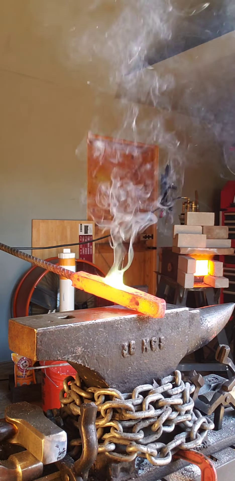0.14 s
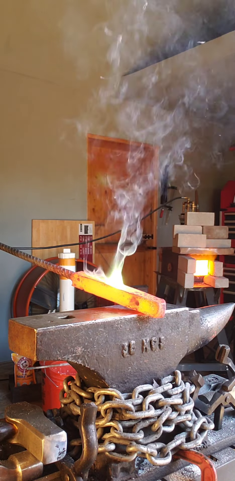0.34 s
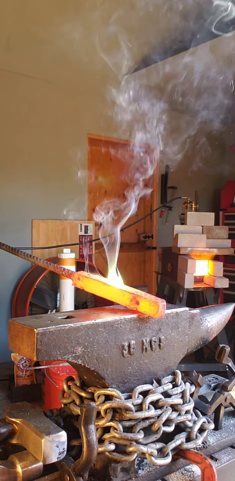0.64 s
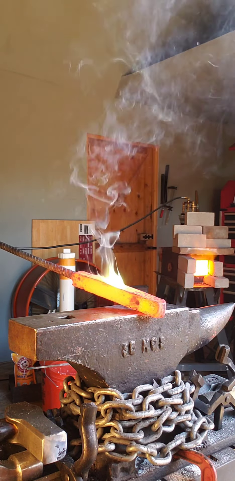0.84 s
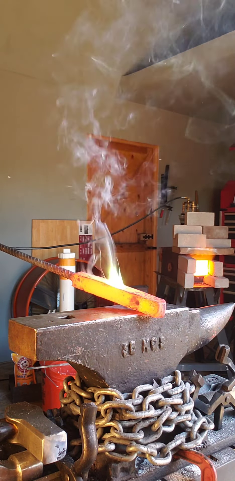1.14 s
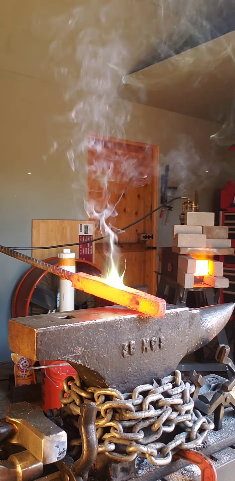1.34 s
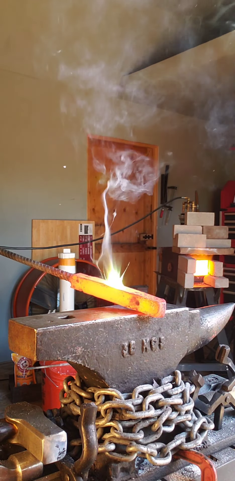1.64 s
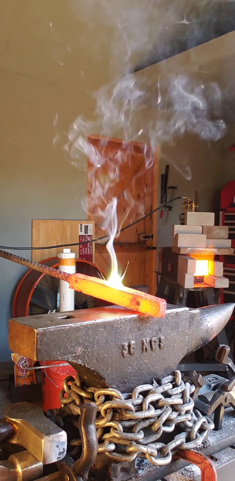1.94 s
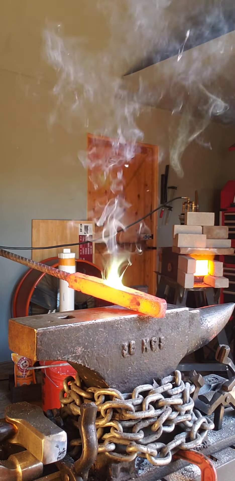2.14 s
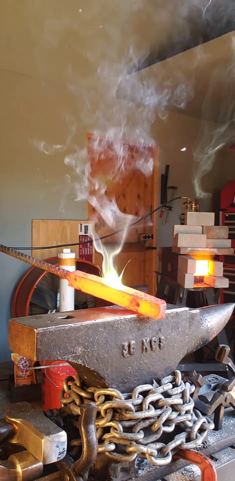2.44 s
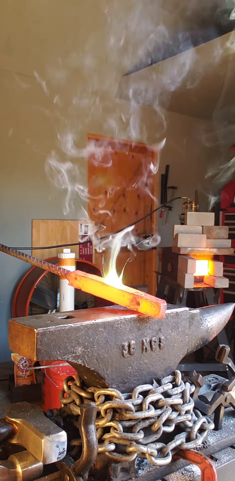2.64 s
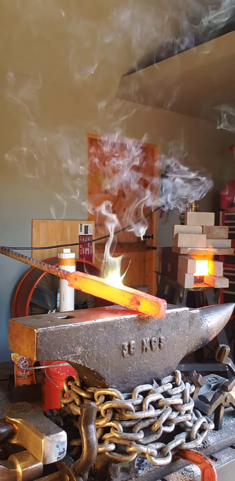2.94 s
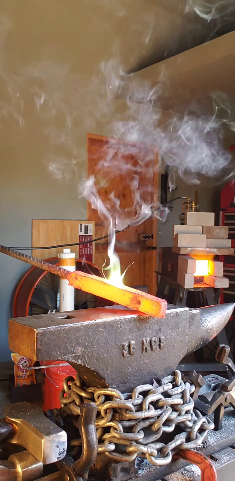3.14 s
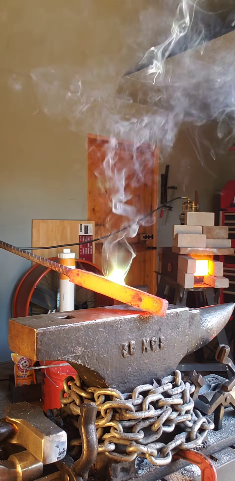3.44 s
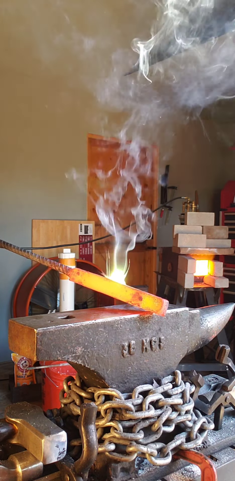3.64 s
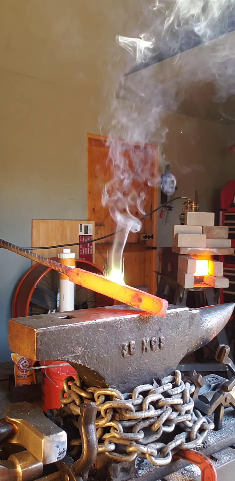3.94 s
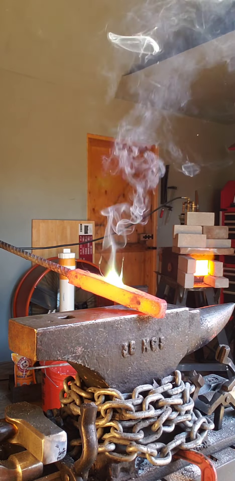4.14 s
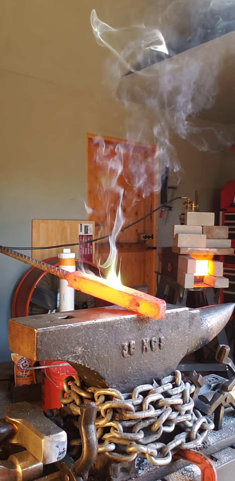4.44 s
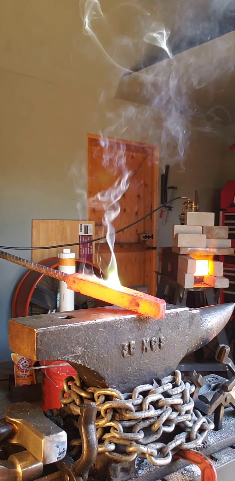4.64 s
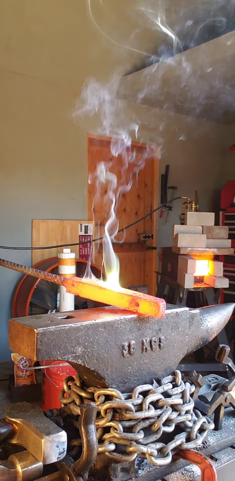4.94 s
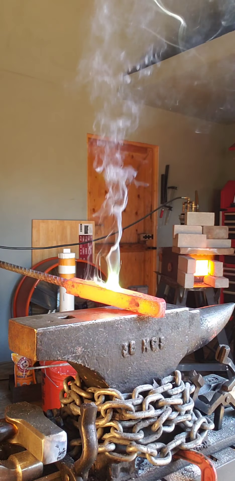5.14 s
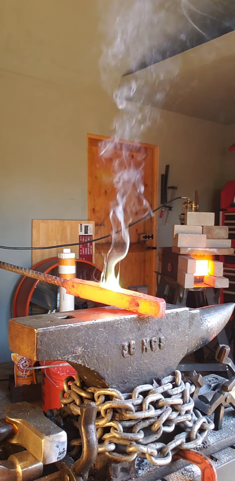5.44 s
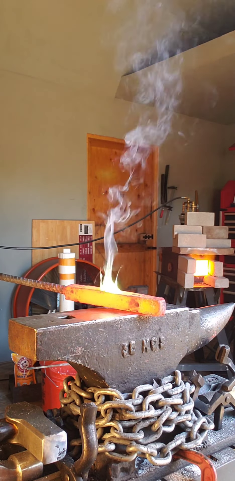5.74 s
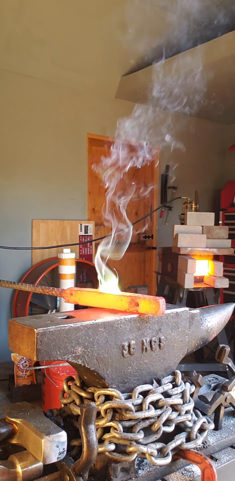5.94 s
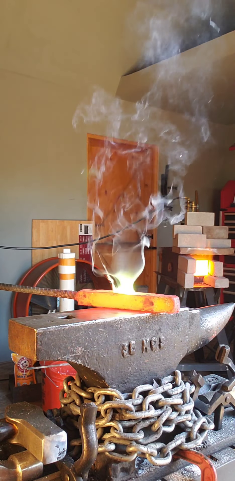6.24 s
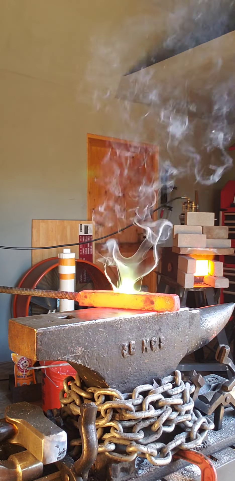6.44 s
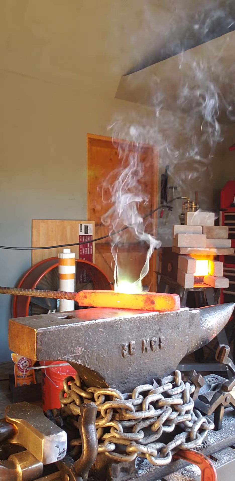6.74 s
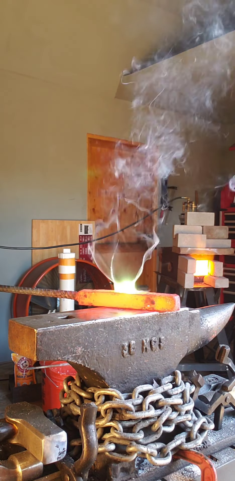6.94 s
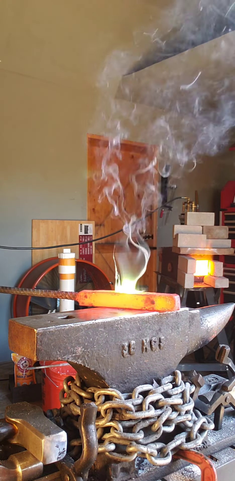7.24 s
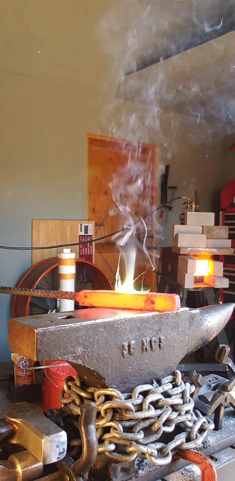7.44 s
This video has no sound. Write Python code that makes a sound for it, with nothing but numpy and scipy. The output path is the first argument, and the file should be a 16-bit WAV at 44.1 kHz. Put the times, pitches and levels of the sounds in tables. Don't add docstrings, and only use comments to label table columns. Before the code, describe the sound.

A lit gas forge roars steadily in a workshop, low-mid and hollow, with faint hiss; late on, a hot bar gives two tiny gritty scrapes.

```python
import sys
import numpy as np
from scipy import signal
from scipy.fft import rfft, irfft, next_fast_len
from scipy.io import wavfile
from scipy.ndimage import uniform_filter1d, map_coordinates

SR = 44100
rng = np.random.default_rng(int(sys.argv[2]) if len(sys.argv) > 2 else 0)


def gain_from_db(level_db):
    decades = np.asarray(level_db, float) / 20
    return 10 ** decades


def master(y):
    cut = np.clip(np.atleast_2d(y).T, -1, 1)
    pcm = np.round(cut * 32767)
    wavfile.write(sys.argv[1], SR, pcm.astype(np.int16))


N = 334485
TIME = np.arange(N) / SR
SIZE = next_fast_len(N + SR)
HZ = np.fft.rfftfreq(SIZE, 1 / SR)

# pitch_hz, width_hz, left_db, right_db
WAVES = [(56.2, 20, -24, -23.5), (71.5, 8, -16, -18.5), (95.8, 15.5, -16.5, -18.5), (122, 22, -19.5, -19.5),
         (136.6, 14, -17, -18), (166.4, 18, -6.5, -8.5), (181.5, 22, -14, -22.5), (207.4, 36, -12.5, -12),
         (227.2, 10, -13.5, -18.5), (238.8, 17, -12.5, -31), (264.4, 25, -15.5, -13.5),
         (277, 9.9, -8, -14.5), (300, 9.5, -15, -59), (304.7, 17, -12, -14), (345.4, 12.4, -4, -10.5),
         (352.1, 7.8, 1.5, 0.8), (375.8, 34.5, -4.5, -13.5), (381.2, 25, -41, -8.5), (407, 19, -10, -14.5),
         (436.3, 13, -4.5, -12.5), (447.2, 17.5, -4.5, -6), (477.8, 14.8, -6.5, -13.5),
         (499, 16.5, -13, -20), (524.5, 23, -16, -14), (547.5, 19.5, -13, -14.5), (576, 13, -13.5, -19.5),
         (591.5, 19, -12, -15), (632, 33, -21, -23), (653, 30, -20.5, -19), (694, 42, -21, -19.5)]
# low_hz, high_hz, swell_s
WAVE_GROUPS = [(0, 150, .3), (150, 322, .2), (322, 402, .2), (402, 495, .2)]
GROUP_LEVELS = [-34.5, -26.5, -22.5, -26]
# time_s, wave_hz, change_db
WAVE_SURGES = [(0.08, 350, 0.5), (0.47, 445, 3), (0.53, 200, -2.5), (0.69, 95, -7), (1.22, 350, -3.5),
               (1.26, 445, 3), (1.47, 350, 1.5), (1.7, 445, 4), (2.0, 445, -1.5), (2.15, 350, -3),
               (2.37, 445, 2.0), (2.85, 200, 3), (2.99, 350, 2.5), (3.34, 350, -4.5), (3.7, 350, -3.5),
               (3.92, 350, 1), (4.3, 350, -1.5), (4.3, 445, -2.5), (4.58, 445, 3), (4.65, 350, 2),
               (5.07, 200, 2), (5.32, 445, -4.0), (5.37, 200, -3), (5.41, 350, -1.5), (5.91, 350, 3.5),
               (6.06, 445, -3), (6.61, 350, 4.5), (6.89, 350, -3.5), (6.99, 445, 3.5), (7.36, 350, 2.5)]


def firebox():
    surge_half_width_s, surge_depth = 0.07, 1.24
    evenness = 0.9
    roar = np.zeros((2, N))
    for (low, high, swell_s), level_db in zip(WAVE_GROUPS, GROUP_LEVELS):
        waves = [wave for wave in WAVES if low <= wave[0] < high]
        ring = turbulence(resonances(waves), patchy_db=0.0)
        ring = ring / ring.mean(0).std()

        span = round(swell_s * SR)
        power = uniform_filter1d(uniform_filter1d(ring.mean(0) ** 2, span), span)
        chance_swell = np.abs(power) + 1e-12

        surge_db = np.zeros(N)
        for time_s, wave_hz, change_db in WAVE_SURGES:
            if low <= wave_hz < high:
                surge_db += change_db * np.exp(-0.5 * ((TIME - time_s) / surge_half_width_s) ** 2)
        roar += gain_from_db(level_db + surge_depth * surge_db) * ring / chance_swell ** (evenness / 2)
    return roar


# pitch_hz, width_hz, left_db_per_hz, right_db_per_hz
TUBE_WAVES = [(727, 26, -62.5, -56), (762, 37, -58.5, -58.5), (799.4, 31.5, -59.5, -52),
              (820, 9, -61.5, -57), (836, 53, -60.5, -61), (876, 16, -58.5, -55), (905, 20, -60, -56.5),
              (922.4, 19, -59, -54.5), (938.5, 14.5, -58.2, -51.5), (991, 53, -62, -57),
              (1023, 25, -69.5, -59), (1041, 14, -71, -58), (1060, 50, -67.5, -70), (1086, 45, -61.5, -65),
              (1136.6, 22.5, -57.5, -59.5), (1155, 17, -80.5, -61.5), (1171, 27, -70, -82),
              (1202, 48, -64, -66), (1245, 50, -63, -62.5), (1283, 25, -65.5, -69), (1318, 40, -63.5, -61),
              (1323, 17, -64.5, -64.5), (1360, 54, -66, -68), (1420, 34, -71, -72.0)]
# pitch_hz, left_db_per_hz, right_db_per_hz
JET_NOISE = [(1460, -71, -71.5), (1640, -71, -69), (1804, -82, -72.5), (1850, -78.5, -79.5),
             (2036, -79, -80), (2213, -72.5, -73), (2254, -78, -75), (2390, -83, -81.5), (2560, -87, -84),
             (2700, -85.5, -88), (2860, -84, -86.5), (3020, -86.5, -85)]


def burner():
    upper_waves = [wave for wave in WAVES if wave[0] >= WAVE_GROUPS[-1][1]]
    upper = gain_from_db(-35.5) * resonances(upper_waves)
    fade_in = [(1250, -120, -120), (1396, -71.0, -72.5)]
    fade_out = [(3120, -91.0, -93.5), (3600, -130, -130)]
    jet = gain_from_db(along(fade_in + JET_NOISE + fade_out))
    jet = jet * walls(t60=0.38, wet_db=-10.0)
    shape = np.sqrt(upper ** 2 + resonances(TUBE_WAVES) ** 2 + jet ** 2)
    flicker_db = 0.25 * wobble(8) + 0.37 * wobble(18)
    return gain_from_db(flicker_db) * turbulence(shape, patchy_db=0.51)


# pitch_hz, left_db_per_hz,
# right_db_per_hz
GAS_HISS = [(3150, -90.5, -87.5), (4060, -93, -89.5), (4530, -94, -85), (4900, -92, -89.5),
            (5400, -96.5, -88), (5860, -100, -97.5), (6300, -99, -99), (7000, -95.5, -96.5),
            (7500, -99.5, -100), (8250, -100, -101.5), (8800, -100.5, -102.5),
            (9180, -94.5, -94.5), (9930, -93, -90), (10500, -94.5, -89), (10970, -92.5, -85.5),
               (12000, -92.5, -86), (12600, -94, -92.5), (13100, -91, -92.5), (13550, -86.5, -88),
               (14200, -89.5, -91.5), (14900, -91.5, -95.5), (15400, -87, -93), (16500, -86, -93)]


def nozzle():
    top_hz = 15750
    fade_in = [(2700, -130, -130), (3010, -93.5, -92)]
    shape = gain_from_db(along(fade_in + GAS_HISS)) * walls(t60=0.25, wet_db=-8.5)
    flutter_db = 0.2 * wobble(4) + 0.4 * wobble(30)
    return gain_from_db(flutter_db) * turbulence(shape * (HZ < top_hz), patchy_db=0.9)


# start_s, peak_level_db, left_minus_right_db
SCRAPES = [
    (6.6029, -35.5, -1.0),
    (6.6694, -44, -1.5),
]


def bar():
    rise_s, fall_s = 0.004, 0.13
    band = signal.butter(4, [2700, 5900], "band", fs=SR, output="sos")
    noise = rng.standard_normal(N) + 0.4 * rng.standard_normal((2, N))
    grit = signal.sosfilt(band, noise)
    level = np.zeros((2, N))
    for start_s, peak_db, pan_db in SCRAPES:
        age = np.clip(TIME - start_s, 0, None)
        peak = gain_from_db([[peak_db + pan_db / 2], [peak_db - pan_db / 2]])
        level += peak * gain_from_db(-60 * age / fall_s) * (1 - np.exp(-age / rise_s))
    return gain_from_db(-9.5) * level * grit / grit.std()


# pitch_hz, level_db, unsteadiness_db
MACHINE_HUMS = [(38, -58.5, .5), (56.9, -57, .5), (58.5, -45.5, .5), (120.1, -47, 1), (190.1, -45, 1.5)]
# pitch_hz, level_db_per_hz
AIR_MOVEMENT = [(5, -86), (30, -81.5), (45, -80), (60, -110)]


def machines():
    tones = np.zeros(N)
    for pitch_hz, level_db, drift_db in MACHINE_HUMS:
        level = np.sqrt(2) * gain_from_db(level_db + drift_db * wobble(0.94))
        tones += level * np.sin(2 * np.pi * (pitch_hz * TIME + rng.random()))
    left_right = gain_from_db([[0.8], [-0.8]])
    return tones * left_right + turbulence(gain_from_db(along(AIR_MOVEMENT)), patchy_db=0.5)


def resonances(waves):
    power = 0
    for pitch_hz, width_hz, left_db, right_db in waves:
        detuning = (pitch_hz * pitch_hz - HZ ** 2) / (HZ * width_hz + 1)
        power = power + gain_from_db([[left_db], [right_db]]) ** 2 / (1 + detuning ** 2) ** 2
    return np.sqrt(power) / np.sqrt(1 + (52 / (HZ + 1)) ** 12)


# pitch_hz, likeness_0_to_1, left_lead_radians
PORT_LIKENESS = [(60, .997, 0), (200, .985, 0), (450, .95, 0), (850, .8, 0), (1100, .5, 1.6),
                 (1300, .82, 3.1), (1650, .85, 3.1), (1780, .3, 1.5), (1900, .7, -.1), (2200, .85, -.5),
                 (2500, .3, -1.2), (2650, .5, -3.1), (3000, .5, -3.3), (4500, .35, -9), (6500, .15, -15.8)]


def turbulence(gain, patchy_db):
    spectra = signal.stft(rng.standard_normal((2, SIZE)), nperseg=512)[2]
    patches = rng.standard_normal(spectra.shape[1:])
    patches = uniform_filter1d(uniform_filter1d(patches, 6, 0), 12, 1)
    patchy = spectra * gain_from_db(patchy_db * patches / patches.std())
    common, differing = rfft(signal.istft(patchy, nperseg=512)[1], SIZE)

    alike, lead = along(PORT_LIKENESS)
    turn = np.arccos(np.clip(alike, 0, 1)) / 2
    left = (np.cos(turn) * common + np.sin(turn) * differing) * np.exp(0.5j * lead)
    right = (np.cos(turn) * common - np.sin(turn) * differing) * np.exp(-0.5j * lead)
    return irfft(np.sqrt(SR / 2) * gain * np.array([left, right]), SIZE)[:, :N]


def walls(t60, wet_db):
    tail = rng.standard_normal(SR) * gain_from_db(-60 * np.arange(SR) / SR / t60)
    echoes = rfft(tail / np.linalg.norm(tail), SIZE)
    ripple = np.abs(1 + gain_from_db(wet_db) * echoes)
    return ripple / np.sqrt(np.mean(ripple ** 2))


def wobble(rate):
    knots = rng.standard_normal(int(N * rate / SR) + 4)
    return map_coordinates(knots, [TIME * rate])


def along(points):
    pitch_hz, *columns = np.transpose(points)
    return np.array([np.interp(np.log(HZ + 1), np.log(pitch_hz + 1), c) for c in columns])


def scene():
    gain = gain_from_db(np.interp(TIME, [0.57, 0.96], [-3, 0]))
    return gain * (firebox() + burner() + nozzle() + machines()) + bar()


def roll_off(x):
    return signal.sosfilt(signal.butter(12, 15890, fs=SR, output="sos"), x)


def record(dry):
    return roll_off(dry)


dry = scene()
out = record(dry)
master(out)
```